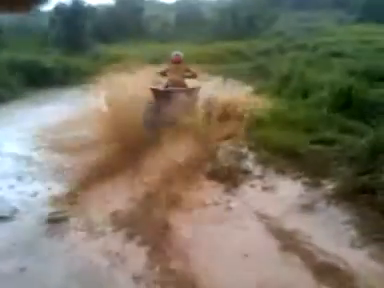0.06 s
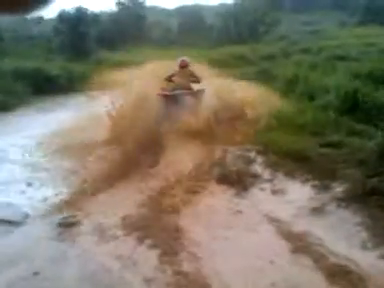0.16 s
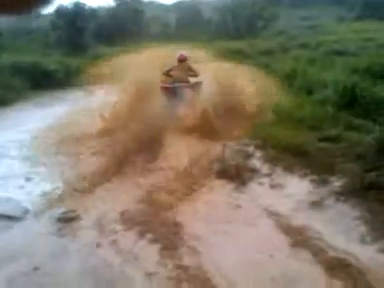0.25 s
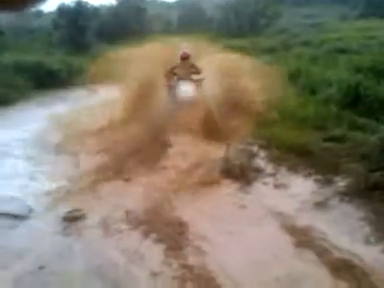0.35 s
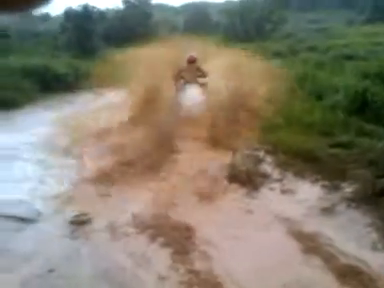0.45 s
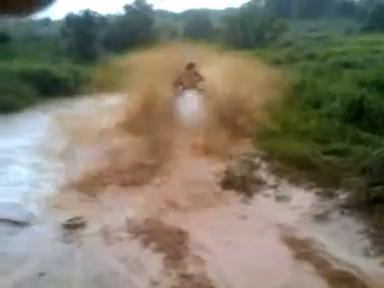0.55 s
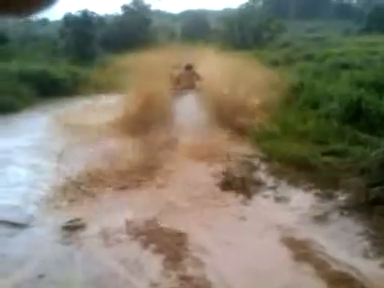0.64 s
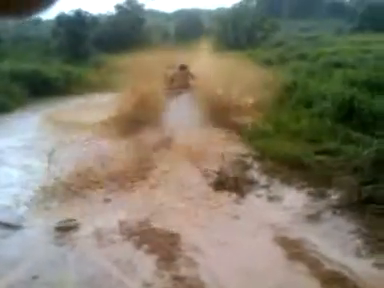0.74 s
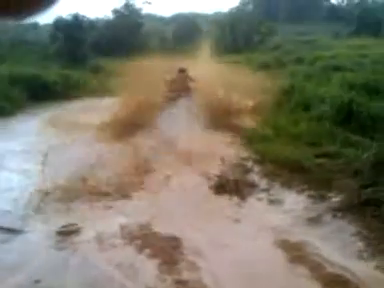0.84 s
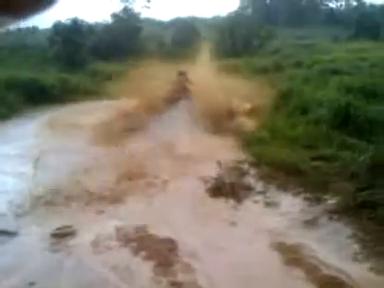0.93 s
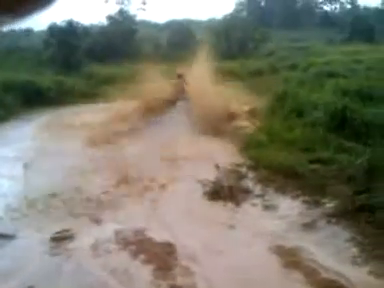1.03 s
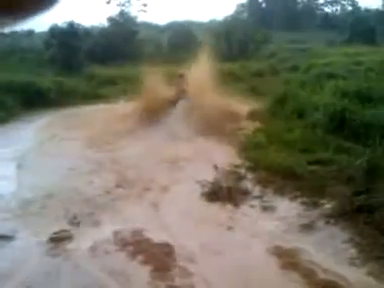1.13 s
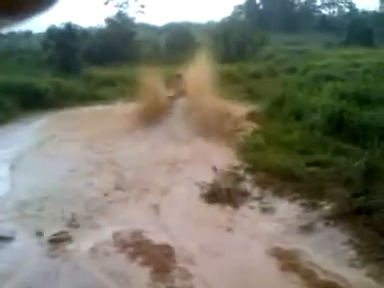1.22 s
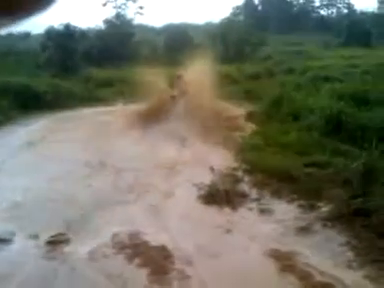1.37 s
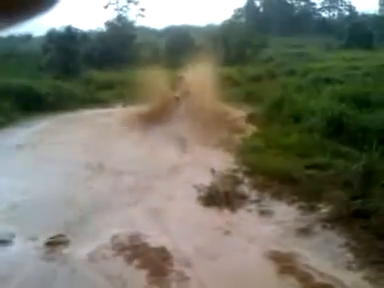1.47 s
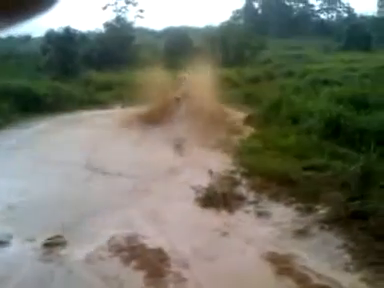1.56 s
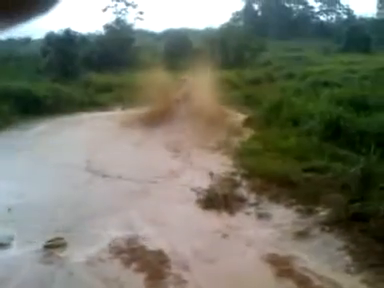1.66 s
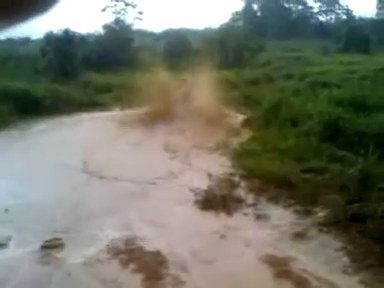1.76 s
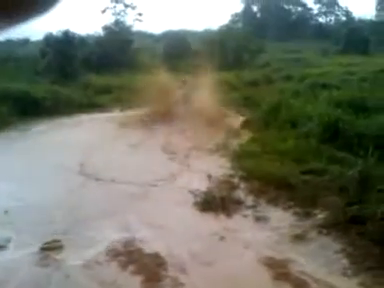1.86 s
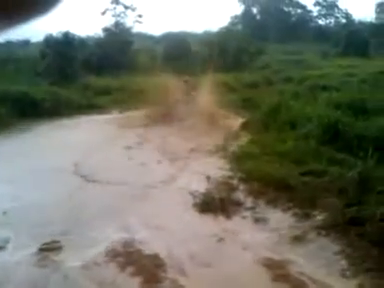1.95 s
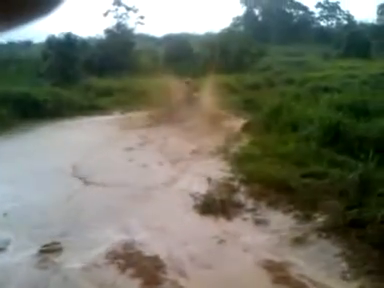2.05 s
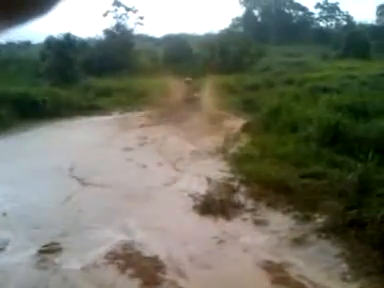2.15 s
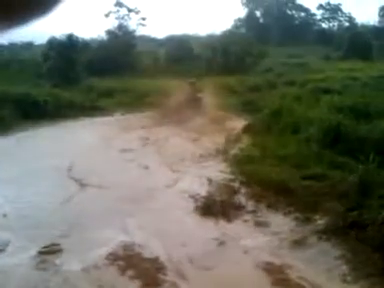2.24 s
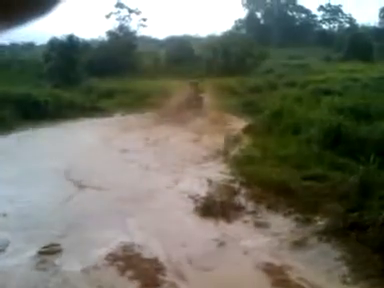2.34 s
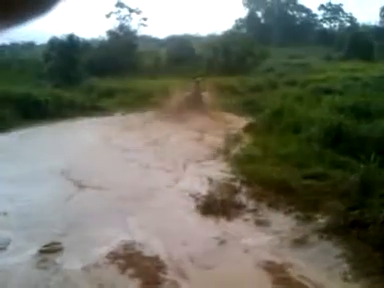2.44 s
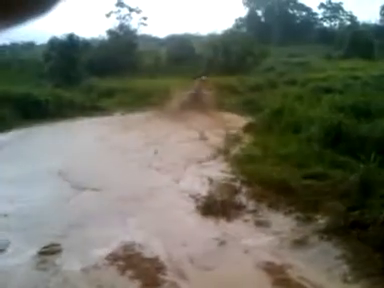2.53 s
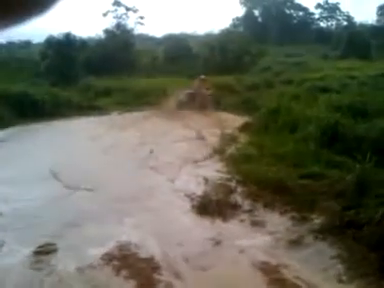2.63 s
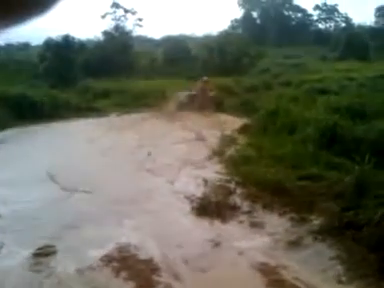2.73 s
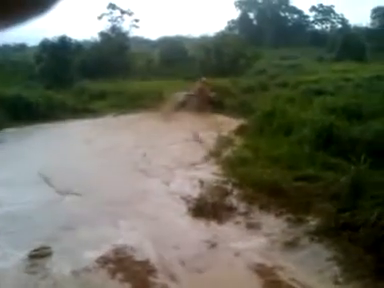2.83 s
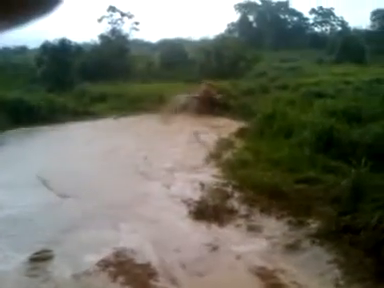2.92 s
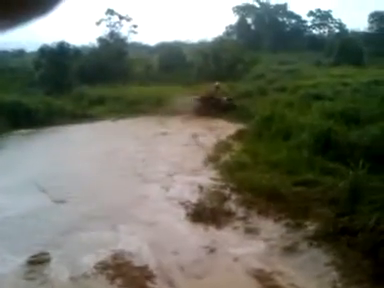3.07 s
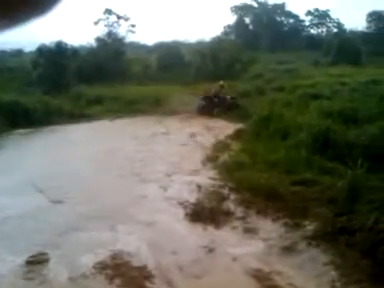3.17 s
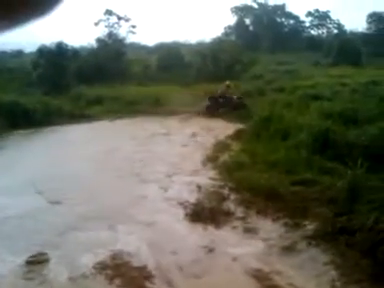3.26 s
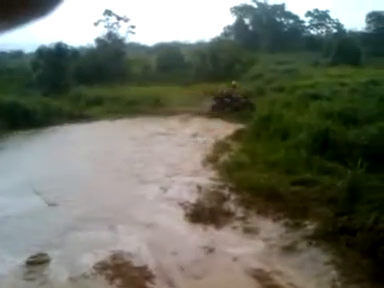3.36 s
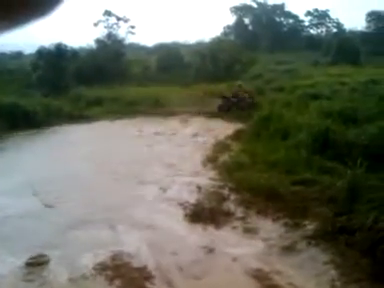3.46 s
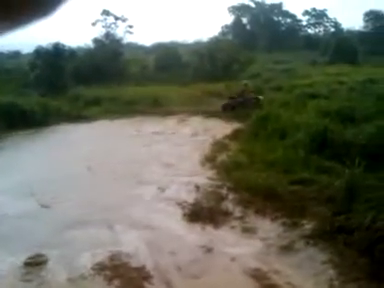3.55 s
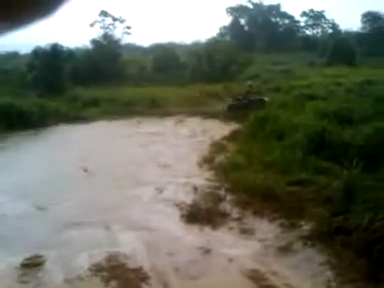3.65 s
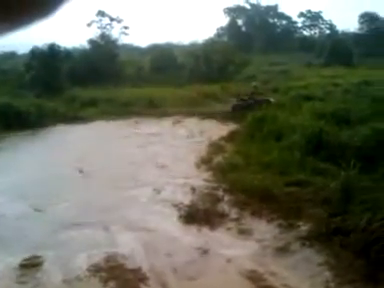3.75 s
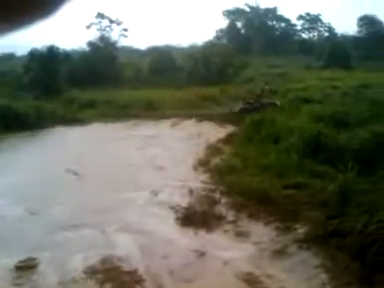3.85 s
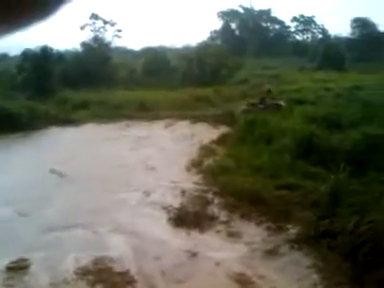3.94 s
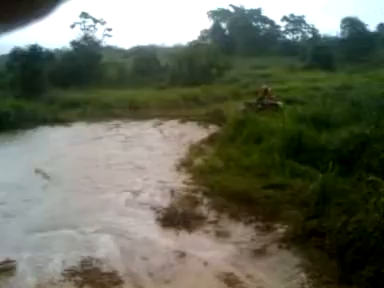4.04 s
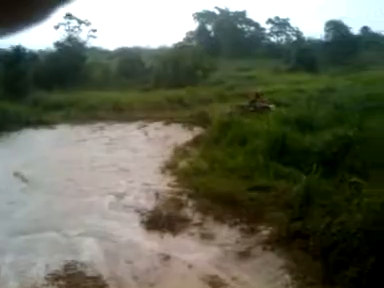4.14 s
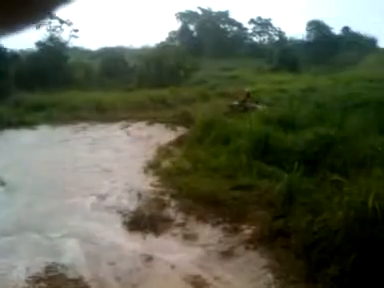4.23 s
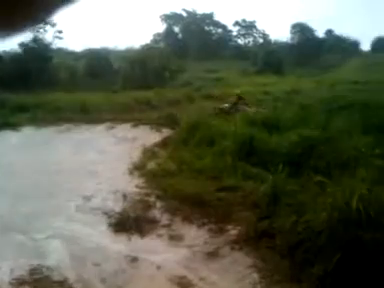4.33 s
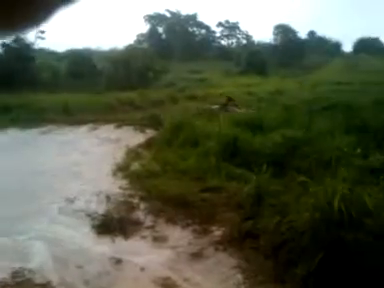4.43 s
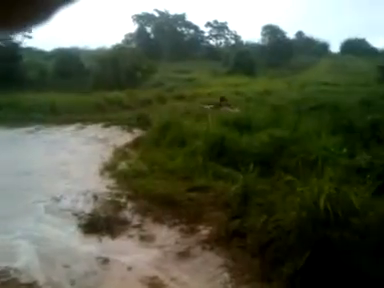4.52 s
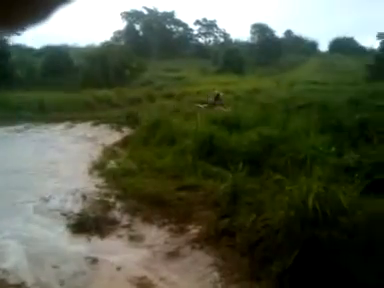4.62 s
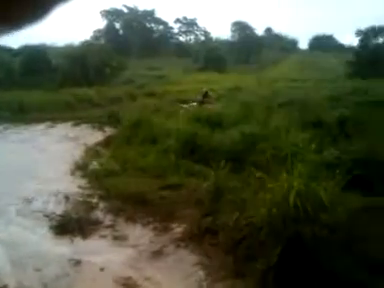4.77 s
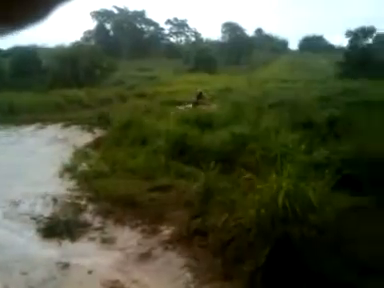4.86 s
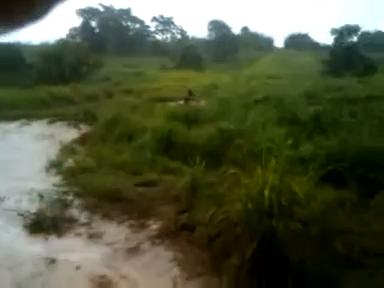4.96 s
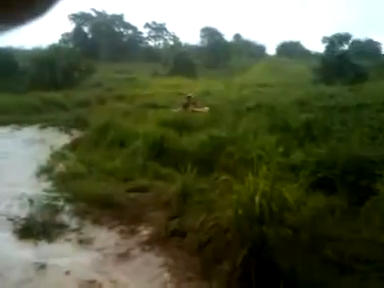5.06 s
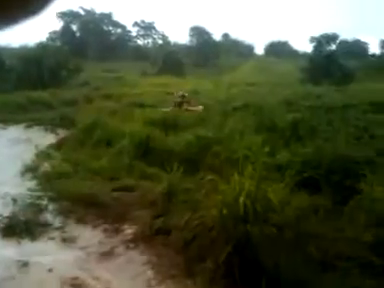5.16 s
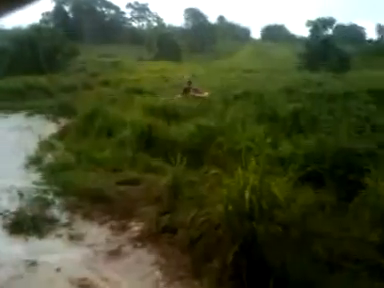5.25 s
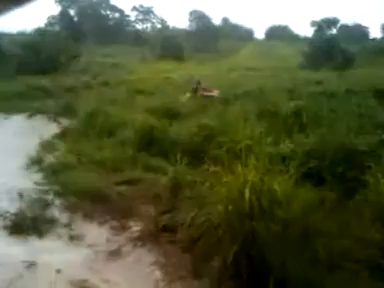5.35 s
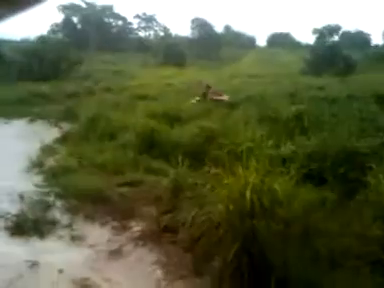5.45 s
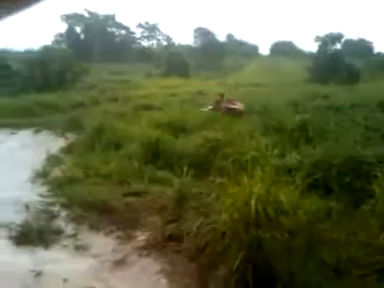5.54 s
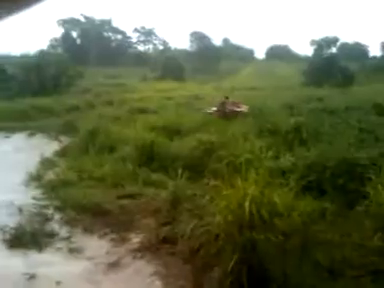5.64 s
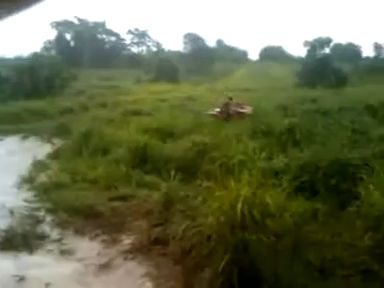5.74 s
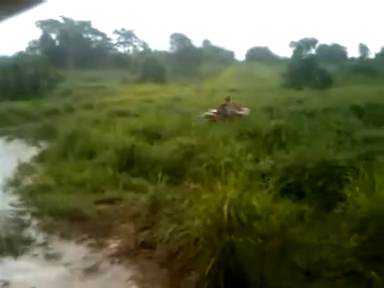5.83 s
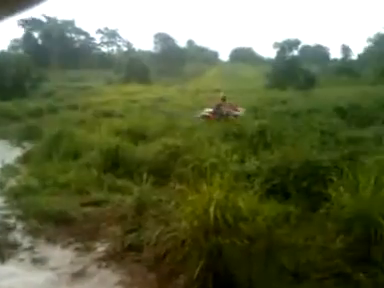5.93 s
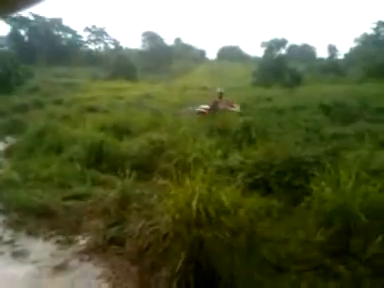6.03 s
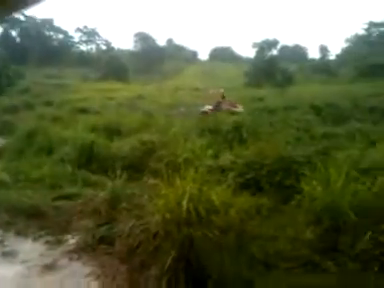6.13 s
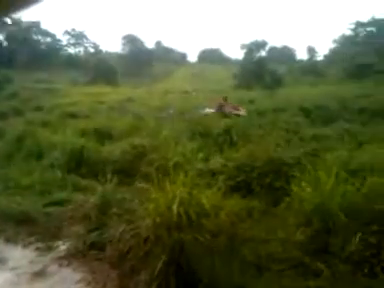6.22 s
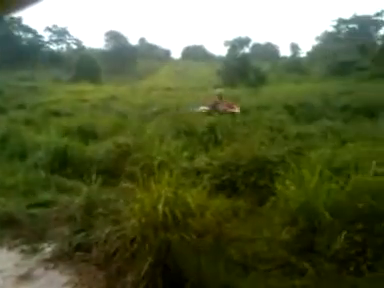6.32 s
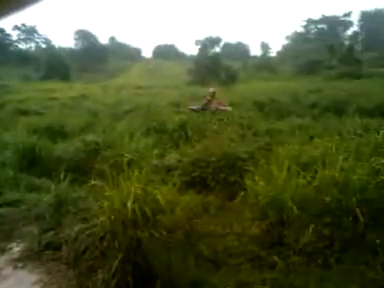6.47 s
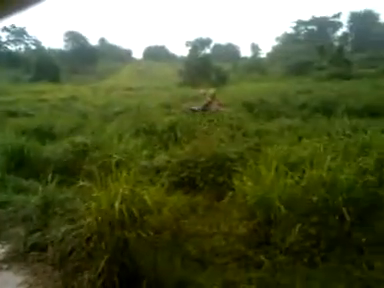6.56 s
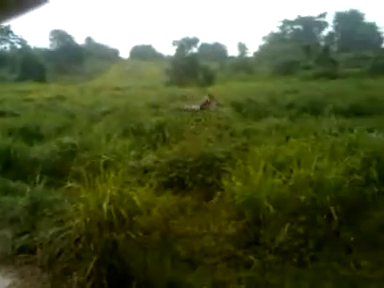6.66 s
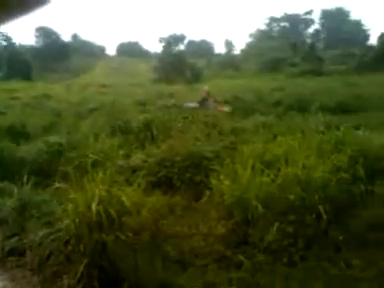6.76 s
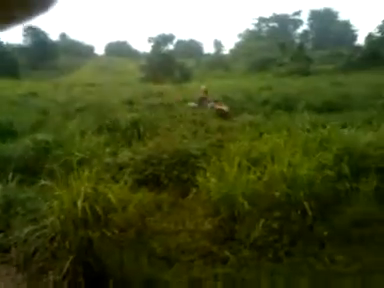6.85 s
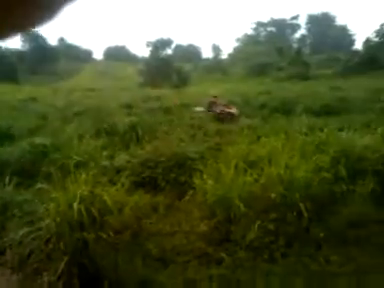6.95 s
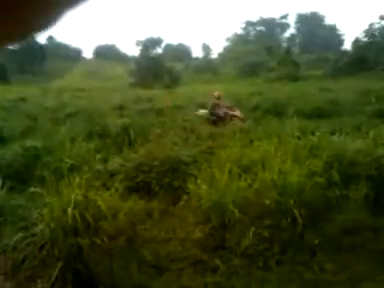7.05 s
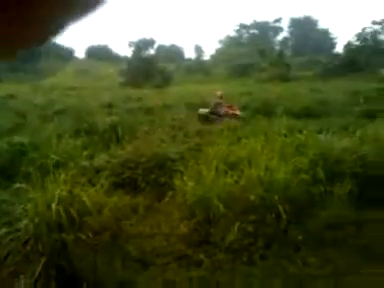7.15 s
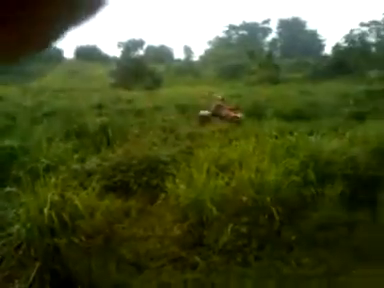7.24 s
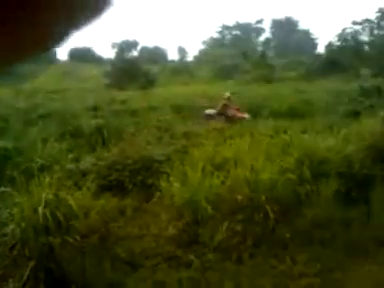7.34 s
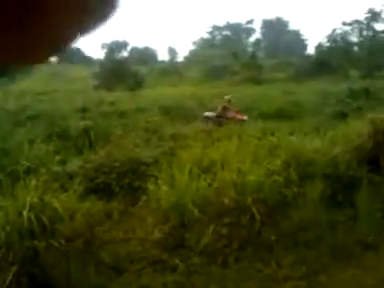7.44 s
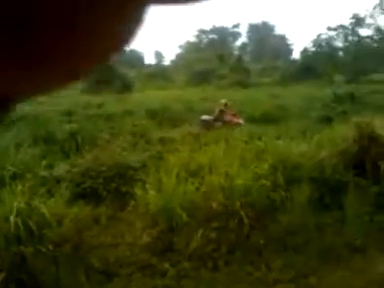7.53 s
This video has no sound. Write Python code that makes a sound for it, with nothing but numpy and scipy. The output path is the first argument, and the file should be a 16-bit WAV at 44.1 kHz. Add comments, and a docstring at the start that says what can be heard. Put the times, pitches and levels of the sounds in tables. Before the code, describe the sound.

Loud quad bike engine and hissing spray, fading to distant puttering with small bursts of throttle.

```python
"""A single-cylinder four-stroke quad bike ploughs away through a flooded trail at full revs, then chugs
round through tall grass. Every firing sends a blow-down pulse out of the exhaust, followed by its
reflections inside the pipe, ringing six layers: boom, thump, honk, bark, crack and rasp.
Spray hisses under the wheels, the engine murmurs and bushes throw back a short, dull scatter.
A narrow-band telephone microphone hears it over a faint outdoor hiss."""
import sys
import numpy as np
from scipy import signal
from scipy.fft import rfft, irfft
from scipy.io import wavfile

SR = 44100
rng = np.random.default_rng(int(sys.argv[2]) if len(sys.argv) > 2 else 0)


def bounce(signal):
    """Save signal as a 16-bit WAV file at the path given by the first command-line argument."""
    frames = np.transpose(np.atleast_2d(signal))
    limited = np.clip(frames, -1, 1)
    pcm = np.round(limited * 32767).astype(np.int16)
    wavfile.write(sys.argv[1], SR, pcm)


N = 334719


def from_db(db):
    """Decibels to gain."""
    return np.exp(np.asarray(db) * (np.log(10) / 20))


def read(rows, s):
    """Columns of a curve table at times s."""
    t, *columns = np.transpose(rows)
    return [np.interp(s, t, c) for c in columns]


def drift(rate_hz):
    """A smooth random wobble with a spread of 1."""
    pole = np.exp(-80 * np.pi * rate_hz / SR)   # one step every 40 samples
    slow = signal.lfilter([1], [1, -2 * pole, pole * pole], rng.standard_normal(N // 40 + 2002))[2000:]
    return np.interp(np.arange(N) / 40, np.arange(len(slow)), slow / slow.std())


def grainy_noise(level, colour, patchy_db, grain_db):
    """Quarter-octave bands of grainy noise, each flickering in its own way."""
    grains = rng.standard_normal((2, N)) * from_db(grain_db * np.array([drift(56), drift(180)]))
    edges = 35 * 2 ** np.arange(0, 7.2, 1 / 4)
    shared_flicker = drift(4)
    hz, db = np.transpose(colour)
    out = 0
    for k, (low, high) in enumerate(zip(edges, edges[1:])):
        band = signal.sosfilt(signal.butter(2, [low, high], "band", fs=SR, output="sos"), grains[k % 2])
        colour_db = np.interp(np.log(low * high) / 2, np.log(hz), db)
        out = out + band * from_db(colour_db + patchy_db * (0.5 * shared_flicker + drift(11)))
    return from_db(read(level, np.arange(N) / SR)[0]) * out / out.std()


def murmur():
    """A low bed of engine clatter and murmur over the outdoor hiss."""
    # The bed's fader. Each row: time in seconds, level in dB.
    level = [(0, -34.5), (2, -45.5), (3, -45), (3.9, -49.5), (4.25, -53.5), (4.5, -50), (5.3, -50.5),
             (6.1, -52), (6.5, -52), (7, -51.5), (7.3, -50), (7.59, -48)]
    # Its tone. Each row: frequency in Hz, relative density in dB.
    colour = [(40, -13), (142, -3.5), (264, -1), (361, -17), (564, -20.5), (1330, -13.5), (1580, -20),
              (1960, -16), (2430, -17), (2750, -13.5), (3050, -19), (3380, -19), (4190, -26.5)]
    return grainy_noise(level, colour, patchy_db=1.7, grain_db=4.1)


def spray():
    """Water thrown by the wheels, with chassis rattle, fading as the bike pulls away."""
    # The spray's fader. Each row: time in seconds, level in dB.
    level = [(0, -16.5), (.5, -22.5), (.9, -23), (1.15, -22), (1.3, -34), (1.7, -41), (2.0, -49.5),
             (2.9, -51.5), (3.5, -62.5), (4.2, -78), (7.59, -83)]
    # Its tone. Each row: frequency in Hz, relative density in dB.
    colour = [(40, -18.5), (140, -15), (300, -2), (600, -1.5), (1330, 0), (1600, -18), (1960, -3.5),
              (2430, -5), (3300, -12.5), (4200, -10.5)]
    return grainy_noise(level, colour, patchy_db=2.2, grain_db=3.0)


def bushes(sound):
    """Foliage scatters the sound back as a short, dull tail."""
    t = np.arange(6000) / SR
    dull_noise = signal.lfilter([.3], [1, -.7], rng.standard_normal(len(t)))
    tail = dull_noise * from_db(-60 * t / 0.062) * (t > .012)
    return signal.fftconvolve(sound, tail / np.linalg.norm(tail))[:N]


def throttle(s):
    """The rider's hand: how far the throttle is shut (0-1) and the extra twist (dB) at times s."""
    # Letting go. Each row: start, moment it is fully open again, closing time, all in seconds.
    lift_offs = [(2.237, 2.572, 0.13), (3.933, 4.583, 0.1), (5.996, 6.365, .08), (6.89, 7.9, 0.23)]
    # Short extra twists. Each row: peak time in seconds, strength in dB, half length in seconds.
    blips = [(1.946, 13, 0.3), (2.658, 10.5, 0.071), (3.023, 20, .2), (4.632, 12.5, 0.23),
             (5.113, 0, 0.066), (5.41, 5, 0.062), (5.7, 6.5, .16), (6.847, -3, 0.27)]
    opening_s = 0.12
    shut = sum(np.clip(np.minimum((s - start) / closing, (end - s) / opening_s), 0, 1)
               for start, end, closing in lift_offs)
    twist_db = sum(db * np.clip(1 - abs(s - at) / half, 0, 1) for at, db, half in blips)
    return shut, twist_db


def firings():
    """The cylinder fires once a cycle: the time of each firing and the firing rate there."""
    # Engine speed. Each row: time in seconds, firings per second.
    revs = [(0.0, 71.27), (0.3, 78.71), (0.6, 78.11), (1.0, 67.11), (1.2, 67.07), (1.5, 49.95),
            (1.7, 46.57), (1.9, 37.73), (2.2, 35.34), (2.4, 25.14), (2.5, 24.9), (2.7, 33.54), (2.8, 31.07),
            (3.1, 34.1), (3.2, 31.24), (3.7, 23.11), (3.8, 26.77), (4.1, 20.48), (4.3, 20.57), (4.4, 16.13),
            (4.7, 27.62), (5.0, 23.75), (5.2, 27.89), (5.3, 26.25), (5.7, 28.83), (6.0, 27.92),
            (6.1, 24.05), (6.3, 22.84), (6.5, 26.38), (6.9, 28.03), (7.0, 24.09), (7.1, 24.94),
            (7.3, 18.95), (7.59, 23.48)]
    cycles = np.cumsum(read(revs, np.arange(N) / SR)[0]) / SR - .917
    s = np.interp(np.arange(int(cycles[-1]) + 1), cycles, np.arange(N) / SR)
    s = np.r_[s[0] - 1 / revs[0][1], s]   # one firing is already ringing at the start
    return s, read(revs, s)[0]


def layer_levels(s, shut, twist_db):
    """Each layer's dB at each firing, set by distance, outlet direction, throttle and uneven burns."""
    # The mix at steady throttle. Each row: time in seconds, then thump, honk, bark and crack in dB.
    middle = [(0, -32, -22.5, -14.5, -16.5), (.19, -23.5, -21, -22, -18), (.32, -18, -25.5, -21, -17),
              (0.509, -19, -21.5, -22, -19), (.7, -21, -17, -20.5, -18.5), (.97, -59, -22.5, -18.5, -23),
              (1.129, -39, -25.5, -18, -21.5), (1.399, -25, -24, -28, -26.5),
              (1.64, -28, -26, -27.5, -29.5), (1.851, -32, -49.5, -43, -54.5),
              (2.152, -29, -37.5, -35, -49.5), (2.599, -31, -34, -42, -44.5),
              (3.05, -33.5, -46, -43.5, -57.5), (3.2, -39.5, -45, -47, -56.5), (3.45, -40, -45.5, -48, -58),
              (3.65, -41.5, -51.5, -58, -62), (3.901, -39.5, -51, -56.5, -57), (4.6, -43, -57, -50.5, -62),
              (5.1, -39.5, -57.5, -46.5, -45.5), (5.5, -42, -53, -44.5, -58), (6, -45.5, -53.5, -42, -63),
              (6.4, -46.5, -54.5, -48.5, -85), (6.9, -47, -57, -43, -61), (7.59, -50.5, -68, -47, -52.5)]
    # The lowest and highest layers, likewise. Each row: time in seconds, level in dB.
    boom = [(0, -29.5), (.5, -27.5), (1.129, -36), (1.501, -51), (2.201, -43), (2.701, -50.5),
            (3.099, -53.5), (3.899, -54), (4.6, -52), (5.5, -47), (6.4, -49), (6.9, -48), (7.59, -48)]
    rasp = [(0, -26), (0.352, -32.5), (0.599, -28.5), (1.149, -25.5), (1.499, -42), (1.65, -42),
            (1.871, -58.5), (2.499, -50.5), (3.2, -59.5), (3.899, -72.5), (4.6, -66), (5.5, -64),
            (6.5, -66), (7.59, -77)]
    # Per layer: the change in dB with the throttle shut, and the share of a twist that it gains.
    shut_db = dict(boom=-9, thump=-14.5, honk=-14, bark=-22, crack=-6.5, rasp=-2.5)
    twist_share = dict(boom=.05, thump=0.018, honk=0.39, bark=0.51, crack=1, rasp=0.38)
    # Misfires. Each row: time in seconds, then low and bright layers in dB against a normal firing.
    misfires = [(1.178, 5, -24), (1.252, 4, -22), (1.267, 4, -24), (1.282, -3, 3), (1.299, -5, -22),
                (2.51, 5, -6), (4.297, 6, 0), (4.403, 6, 0)]
    low, bright = rng.normal(0, 1.4, (len(s), 2)).T   # no two burns are alike
    for at, low_db, bright_db in misfires:
        k = np.argmin(abs(s - at))
        low[k], bright[k] = low_db, bright_db
    burn_db = dict(boom=low, thump=low, honk=low, bark=bright, crack=bright, rasp=bright)
    steady_db = read(boom, s) + read(middle, s) + read(rasp, s)
    return {name: db + shut_db[name] * shut + twist_share[name] * twist_db + burn_db[name]
            for name, db in zip(burn_db, steady_db)}


def blow_down(modes, tuning, ring, rough, echo_db, jet_s, rise_s, top_hz):
    """One row per firing: a pulse, a dying gas jet and the pipe echoes ring the modes; energy 1."""
    # The pulse running to and fro in the pipe. Each row: delay in seconds, relative level in dB.
    echoes = [(.0071, -3.5), (0.0162, -18.5), (.0213, -45)]
    t, count = np.arange(2560) / SR, len(rough)
    jet = rng.standard_normal((count, len(t))) * np.exp(-t / jet_s)
    kick = np.sqrt(rough)[:, None] * jet / np.linalg.norm(jet, axis=1, keepdims=True)
    kick[:, 0] -= np.sqrt(1 - rough)   # rough is the jet's share of the energy, the rest is the pulse
    hz = np.fft.rfftfreq(len(t), 1 / SR)
    pipe = 1 + sum(from_db(db + echo_db[:, None]) * np.exp(-2j * np.pi * hz * lag) for lag, db in echoes)
    pipe = pipe / (1 + 1j * hz / top_hz) ** 2   # the baffles dull what lies above the layer
    body = 0
    for pitch, db, t60 in modes:
        mode_hz = pitch * tuning[:, None] * rng.normal(1, .005, (count, 1))
        gain = from_db(db + rng.normal(0, 1.3, (count, 1)))
        decay = from_db(-60 * t / (t60 * ring[:, None]))
        body = body + gain * np.sin(2 * np.pi * mode_hz * t) * decay
    valve_opening = 1 - np.exp(-t / rise_s)
    pulses = irfft(rfft(kick) * pipe * rfft(body * valve_opening))
    return pulses / np.linalg.norm(pulses, axis=1, keepdims=True)


def exhaust():
    """Every firing blows down through the pipe and silencer as a stack of six ringing layers."""
    # Resonances of the deep boom, the hollow honk, the shock front's crack and the rasp on top.
    # Each row: base pitch in Hz, relative level in dB, base t60 in seconds.
    boom_modes = [(71.6, -18, 0.063), (146.4, -6.5, 0.065)]
    honk_modes = [(433.4, 6, 0.034), (576.8, -1, 0.033)]
    crack_modes = [(1328, 1.5, 0.012), (1832, 8, 0.01), (1997, 0, 0.011)]
    rasp_modes = [(2910, -8, 0.015), (3273, -8.5, 0.017)]
    # The silencer's thump and the tail pipe's bark.
    # Each row: multiple of the layer's pitch, relative level in dB, base t60 in seconds.
    thump_modes = [(.76, -22, .06), (1, 47.5, 0.046), (1.2, -4, 0.062)]
    bark_modes = [(.8, -22, 0.023), (1.001, 36, 0.012), (1.35, 2, 0.056), (1.75, -21, 0.026)]
    # How those two glide. Each row: time in seconds, pitch in Hz.
    thump_pitch = [(0, 348), (.19, 313), (.7, 274), (.9, 380), (1.3, 353), (2.2, 329), (2.4, 307),
                   (2.8, 320), (3.9, 308), (4.15, 262), (4.75, 316), (5.3, 277), (6.35, 247), (6.95, 311),
                   (7.3, 260), (7.59, 253)]
    bark_pitch = [(0, 1001), (.5, 664), (.64, 850), (.77, 686), (.92, 775), (1.15, 722), (1.4, 713),
                  (2.2, 697), (2.43, 823), (2.65, 732), (3.3, 744), (3.8, 746), (4.05, 980), (4.5, 970),
                  (4.87, 1037), (5.4, 932), (6, 880), (6.6, 818), (7.4, 1050)]
    # Pitch bends as the outlet turns. Each row: time in seconds, factor on honk, factor on crack.
    bends = [(0, 0.99, 0.88), (.25, 1.21, 1), (.45, 1.216, .99), (.7, 1.167, 1.11), (.9, 1.1, 1.052),
             (1.2, 1.016, 1.057), (1.7, 0.906, 1.023), (2.2, .99, 1.03), (3.2, 1.06, 1.055),
             (4.3, 0.87, 0.9), (4.6, 0.98, 0.63), (5.3, 0.97, 0.66), (6, 1.035, 0.56), (7.59, 1.1, 1.22)]
    # The pipe echo is weak while the outlet points straight back. Each row: time in seconds, trim in dB.
    echo_trim = [(0, -15), (1.6, -22), (2, -5.5), (2.6, -6), (4.5, -3.5), (7.59, -2.5)]
    # The silencer rings longer from the side. Each row: time in seconds, factor on thump and honk t60.
    ringing = [(0, 1.31), (1.2, 0.39), (2.2, 0.88), (3.1, 1.13), (3.4, 1.7), (4, 2.55), (4.6, 1.4),
               (7.59, 0.64)]

    s, rate = firings()
    shut, twist_db = throttle(s)
    level_db = layer_levels(s, shut, twist_db)
    thump_hz, bark_hz = read(thump_pitch, s)[0], read(bark_pitch, s)[0]
    honk_bend, crack_bend = read(bends, s)
    ring, flat = read(ringing, s)[0], np.ones(len(s))
    echo_db = read(echo_trim, s)[0]
    low_echo_db, no_echo_db = echo_db - 8, -99 * flat
    # Noisier with the throttle shut, ever cleaner above 34 firings per second.
    rough = (.24 + .16 * shut) * np.minimum(1, 34 / rate) ** 2
    layers = dict(
        boom=blow_down(boom_modes, flat, flat, rough / 2, no_echo_db,
                       jet_s=0.0022, rise_s=0.0035, top_hz=290),
        thump=blow_down(thump_modes, thump_hz, ring, rough / 2, low_echo_db,
                        jet_s=0.007, rise_s=0.0029, top_hz=519),
        honk=blow_down(honk_modes, honk_bend, ring, rough / 2, low_echo_db,
                       jet_s=0.0028, rise_s=0.0033, top_hz=966),
        bark=blow_down(bark_modes, bark_hz, flat, rough, echo_db,
                       jet_s=0.0083, rise_s=0.0011, top_hz=1620),
        crack=blow_down(crack_modes, crack_bend, flat, np.sqrt(rough), echo_db,
                        jet_s=0.0053, rise_s=0.0013, top_hz=2620),
        rasp=blow_down(rasp_modes, flat, flat, np.cbrt(rough), echo_db,
                       jet_s=0.0026, rise_s=0.00096, top_hz=6050))
    pulses = sum(from_db(level_db[name])[:, None] * layer for name, layer in layers.items())
    pulses *= np.sqrt(SR / rate)[:, None]   # levels are rms: slower firing packs more into each pulse
    length = pulses.shape[1]
    out = np.zeros(N + 3 * length)
    starts = (s * SR).astype(int) + length
    np.add.at(out, starts[:, None] + np.arange(length), pulses)
    return out[length:][:N]


def scene():
    """The exhaust up front with its scatter from the bushes, over spray and murmur; mono."""
    bike = from_db(1.5) * exhaust()
    return (bike + from_db(-19) * bushes(bike) + spray() + murmur())[None]


def record(dry):
    """Telephone sound: peaks rounded by the capsule, narrow band, converter clip and hiss, steep top."""
    overload, full_scale, hiss_db = 0.66, .71, -106
    band = signal.sosfilt(signal.butter(3, 80, "high", fs=SR, output="sos"), dry)
    band = overload * np.tanh(band / overload)
    band = signal.sosfilt(signal.butter(9, 4130, fs=SR, output="sos"), band)
    band = signal.sosfilt(signal.cheby2(8, 50, 4900, fs=SR, output="sos"), band)
    band = np.clip(band, -full_scale, full_scale) + from_db(hiss_db) * rng.standard_normal(dry.shape)
    return signal.sosfilt(signal.cheby2(12, 70, 15800, fs=SR, output="sos"), band)


dry = scene()
out = record(dry)
bounce(out)
```